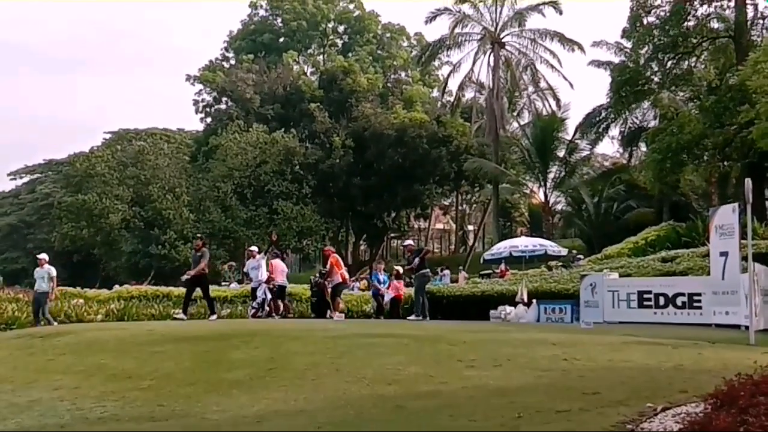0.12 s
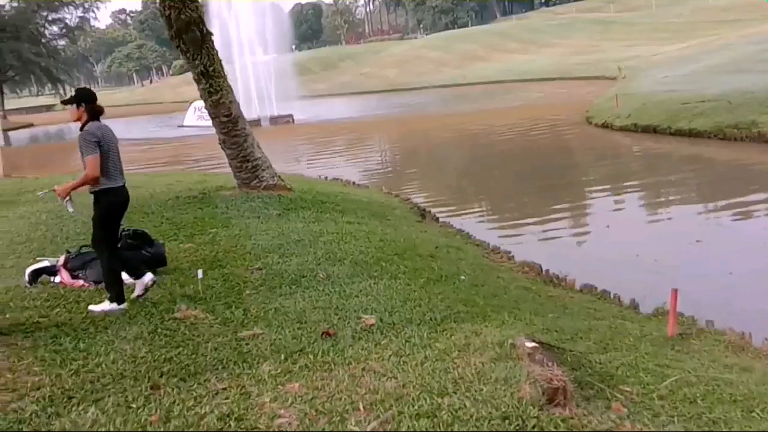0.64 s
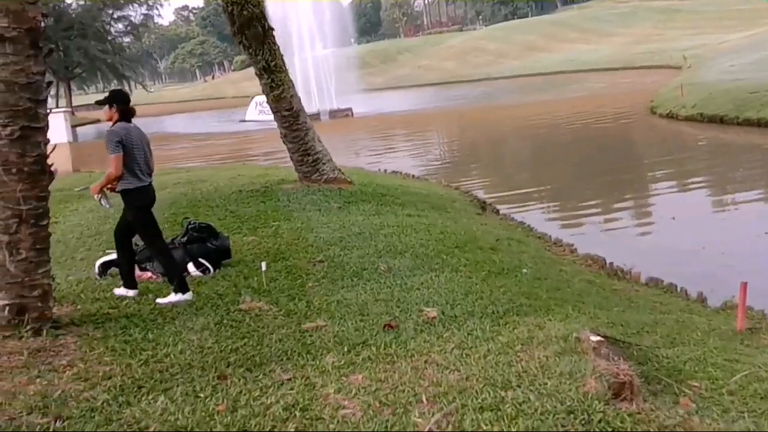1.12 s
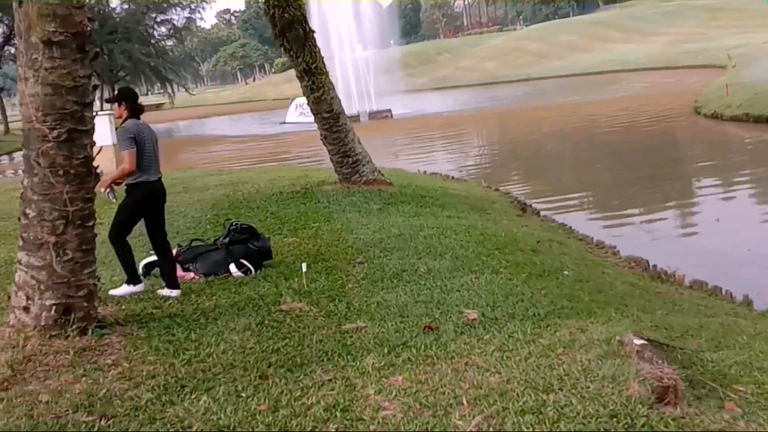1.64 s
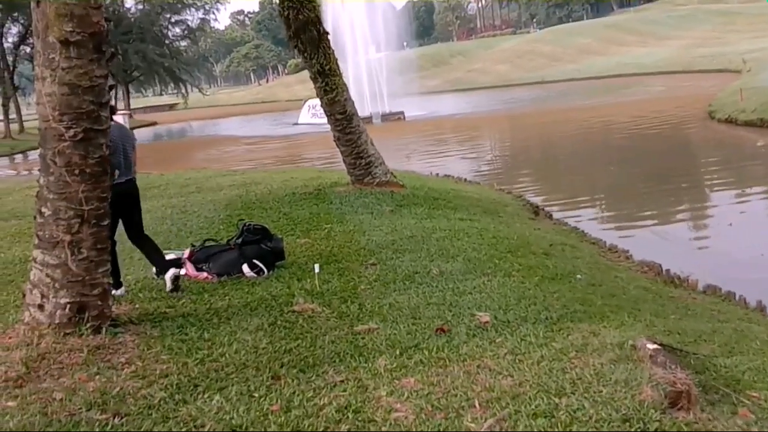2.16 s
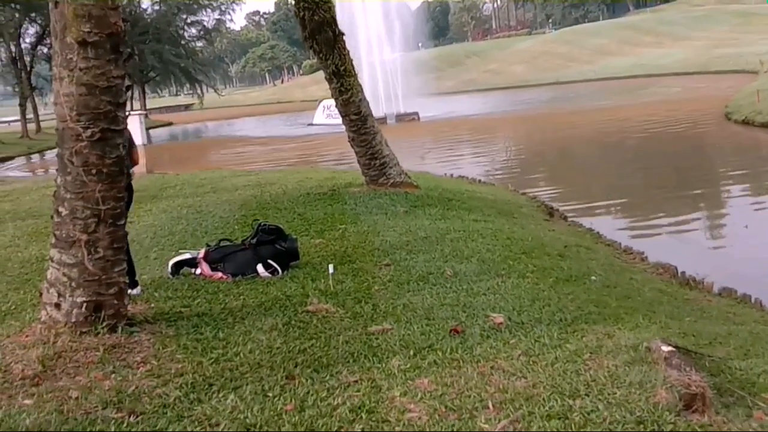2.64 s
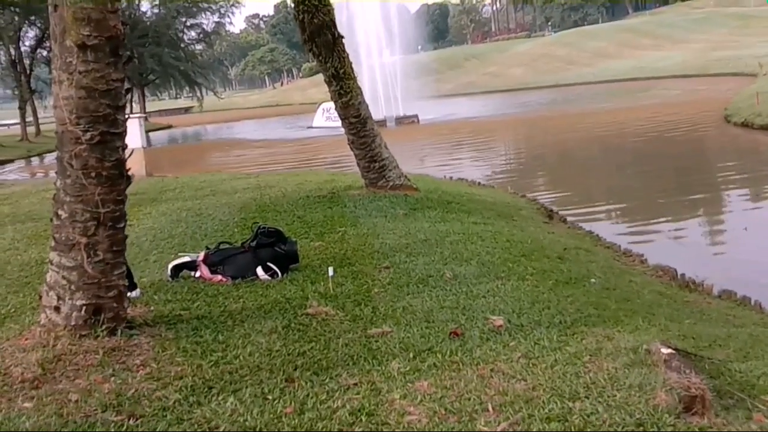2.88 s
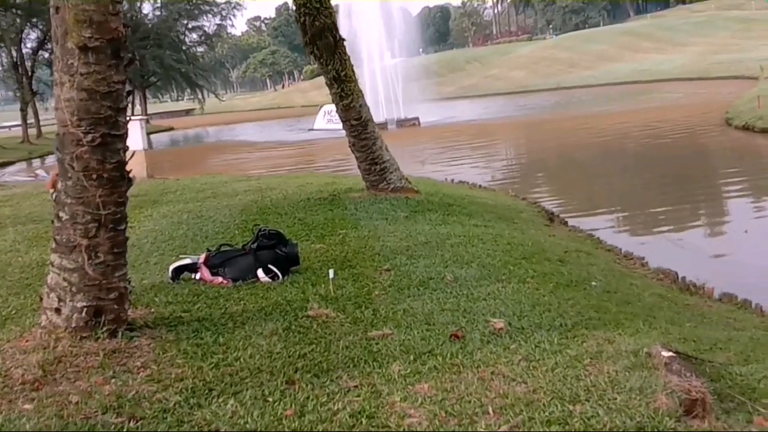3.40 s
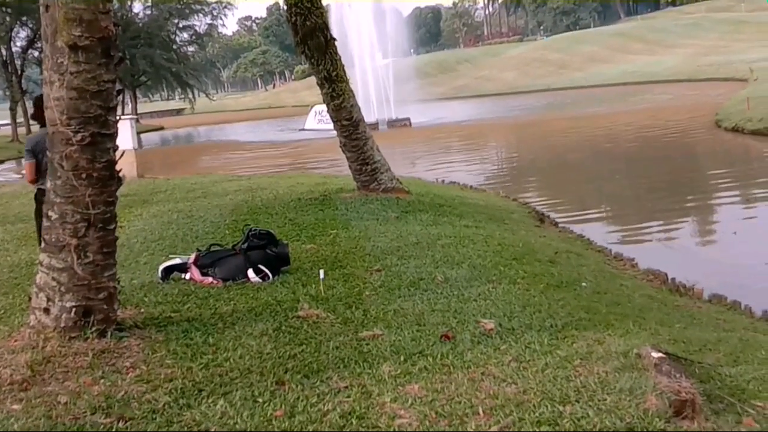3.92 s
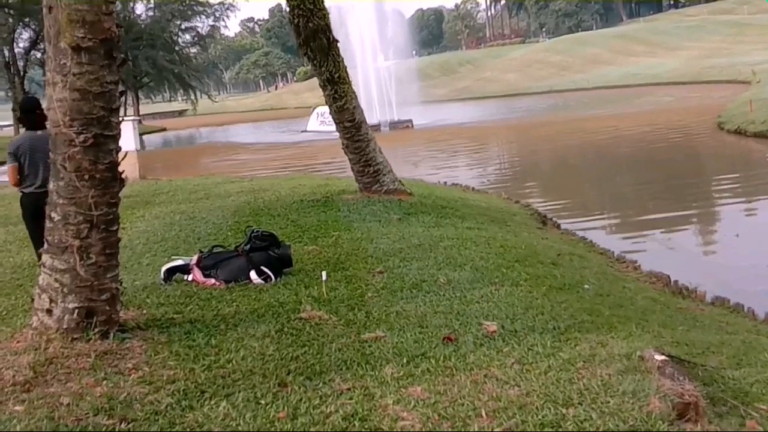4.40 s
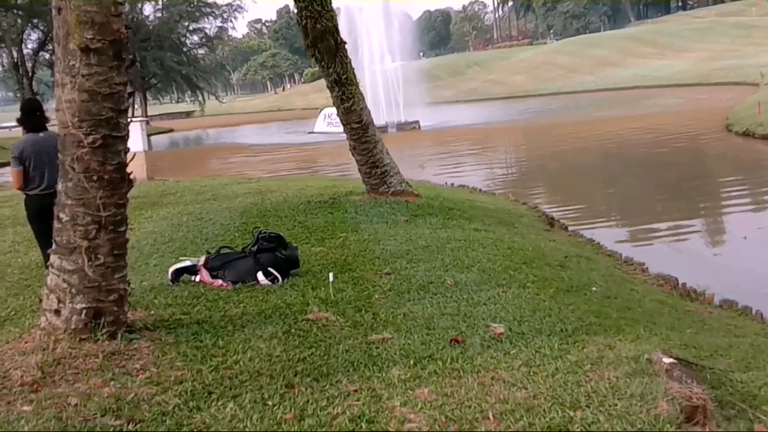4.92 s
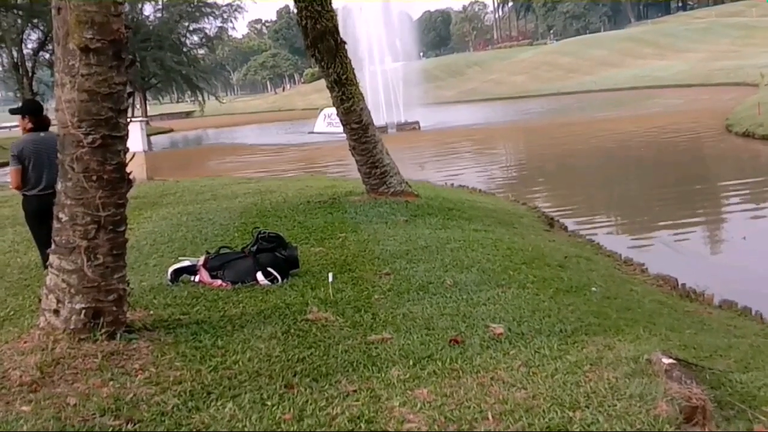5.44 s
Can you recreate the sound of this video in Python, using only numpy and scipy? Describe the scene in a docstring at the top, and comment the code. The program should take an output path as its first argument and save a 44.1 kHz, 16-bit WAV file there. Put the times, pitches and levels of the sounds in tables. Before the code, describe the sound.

A nearly silent lawn with light wind bumps cuts out, and after a brief gap water spray rises within a third of a second and stays. The fountain is smooth hiss, with small ringing drops and low bubbling surges where water lands. Irregular bassy wind hits the microphone in clusters. The sound is slightly hollow, coloured by the camera case, with thin compressed treble and shifting width.

```python
"""Lawn, then pond fountain

A small camera outdoors: a quiet lawn, a short silence, then a pond fountain fading in.
Shaped noise makes the spray and the air, all coloured by the camera's case; ringing bubbles make drops and gurgles.
Wind rumbles as uneven low noise and thumps as short swings on the microphone; one faint whistle is a gliding sine."""
import sys
import numpy as np
from scipy import signal
from scipy.fft import rfft, irfft
from scipy.io import wavfile
from scipy.ndimage import uniform_filter1d

SR = 44100
rng = np.random.default_rng(int(sys.argv[2]) if len(sys.argv) > 2 else 0)


def gain_from_decibels(decibels):
    """Convert decibel values to linear amplitude factors."""
    exponent = np.asarray(decibels, float) / 20
    return 10 ** exponent


def generate_wav(sig):
    """Save sig (samples, or channels by samples) to the path in sys.argv[1] as 16-bit PCM at SR."""
    pcm = np.round(np.clip(np.atleast_2d(sig).T, -1, 1) * 32767).astype(np.int16)
    wavfile.write(sys.argv[1], SR, pcm)


N = 244755


def evened(x):
    """Scales to rms 1."""
    return x / np.sqrt(np.mean(x ** 2) + 1e-20)


def read(points, hz):
    """Reads a spectrum table on a log-frequency axis."""
    f, value = np.transpose(points)
    return np.interp(np.log(hz + 1), np.log(f + 1), value)


def slow(hz, count):
    """Random wander of rms 1 at count evenly spread moments: sines up to hz, the slower ones stronger."""
    t = np.linspace(0, N / SR, count)
    waves = [np.sin(2 * np.pi * (f * t + rng.random())) / np.sqrt(f) for f in np.geomspace(hz / 20, hz, num=24)]
    return evened(sum(waves))


def airy(colour_db, width_db, size, patchy_db, flicker_db, sway_db):
    """Stereo noise from random short-time spectra with patches, shared flicker and a swaying width."""
    hop = size // 4
    frames = N // hop + 5
    hz = np.fft.rfftfreq(size, 1 / SR)
    a, b, c, d, patches = rng.standard_normal((frames, len(hz), 5)).T
    patches = uniform_filter1d(patches, size=5, axis=0)
    patches = evened(uniform_filter1d(patches, size=8, axis=1))
    field = gain_from_decibels(colour_db(hz)[:, None] + patchy_db * patches + flicker_db * slow(16, count=frames))
    mid = a + 1j * b
    side = (c + 1j * d) * gain_from_decibels(width_db(hz)[:, None] + sway_db * slow(30, count=frames))
    spectra = field * np.array([mid + side, mid - side])
    return evened(signal.istft(spectra, nperseg=size, noverlap=size - hop)[1][:, :N])


# peaks and notches of the case around the microphone: (f/Hz, width/Hz, level/dB)
CASE_RINGS = [(983, 78, -13.5), (1256, 160, 14), (2056, 360, 6.5), (2386, 54, -16), (2590, 330, 6),
              (2967, 91, -9), (6650, 111, -35)]


def case_db(hz):
    """The case boosts or weakens sound near its own pitches: a sum of bell shapes."""
    return sum(db / (1 + (2 * (hz - f) / width) ** 2) for f, width, db in CASE_RINGS)


# how wide the pond and the wind's rumble sound: (f/Hz, side over mid level/dB)
STEREO_WIDTH = [(60, -16.5), (150, -21), (380, -3), (900, -9), (1300, -18), (2400, -14.5), (4000, -4.5),
                (6000, -13.5), (10000, -6), (11800, -8), (12300, -28), (14800, -3)]


def stereo_width_db(hz):
    """How strong the left-right difference is beside the centre, pitch by pitch."""
    return read(STEREO_WIDTH, hz)


# quiet air over the lawn, before the case colours it: (f/Hz, relative level per Hz/dB)
LAWN_COLOUR = [(250, -12.5), (450, -17), (900, -20), (2000, -26), (5800, -29.5), (7000, -39.5),
               (13500, -46), (15000, -34)]


def lawn():
    """Faint, wide and fairly even air: shaped noise, coloured by the case at about half strength."""
    def colour_db(hz):
        return read(LAWN_COLOUR, hz) + 0.54 * case_db(hz) * (hz < 1800)  # the case is heard only below 1800 Hz

    air = airy(colour_db, lambda hz: 0 * hz - 3, size=1024, patchy_db=1.5, flicker_db=.5, sway_db=1)
    return gain_from_decibels(-69) * air


# wind strength between the thumps: (t/s, level/dB)
WIND_STRENGTH = [(0.0, -64.5), (0.5, -72.5), (0.62, -50.5), (0.91, -61), (1.07, -54.5), (1.68, -54),
                 (1.93, -56), (2.66, -56), (3.4, -60), (3.76, -53.5), (4.0, -62), (4.24, -59),
                 (4.36, -60.5), (4.58, -50.5), (5.09, -54), (5.27, -61.5), (5.55, -55)]


def wind_db(t):
    """Strength of the wind at the given moments."""
    return np.interp(t, *np.transpose(WIND_STRENGTH))


# turbulence at the microphone: (f/Hz, relative level per Hz/dB)
RUMBLE_COLOUR = [(12, -58), (20, -25), (32, -51), (65, -7), (92, 2.5), (158, 3.5), (216, -23.5), (330, -20),
                 (430, -52), (730, -120)]


def rumble():
    """Turbulent air presses unevenly on the microphone: lumpy low noise that follows the wind."""
    noise = airy(lambda hz: read(RUMBLE_COLOUR, hz), stereo_width_db, size=1024,
                 patchy_db=2.0, flicker_db=2.0, sway_db=2.0)
    return gain_from_decibels(wind_db(np.arange(N) / SR)) * noise


def eddies():
    """Lesser eddies at random moments, as strong as the wind allows: rows like those of the strong ones."""
    per_s, over_wind_db = 5.3, 3
    low_hz, high_hz, typical_s = 81.4, 137, 0.014
    when, pitch, size, span = rng.random((round(per_s * N / SR), 4)).T
    s = when * N / SR
    db = wind_db(s) + over_wind_db + 6 * (size - .5)
    return list(zip(s, db, low_hz + (high_hz - low_hz) * pitch, typical_s * (.5 + span)))


# strong eddies that hit the membrane: (t/s, peak level/dB, f/Hz, length at half height/s)
STRONG_EDDIES = [(0.014, -51, 96, 0.018), (0.287, -46.5, 140, 0.004), (0.305, -51, 81.4, 0.015),
                 (0.436, -40, 123, 0.0066), (0.473, -52.5, 74, 0.052), (1.531, -44, 103, 0.018),
                 (1.69, -45.5, 81, 0.025), (1.993, -43, 125, 0.013), (2.309, -40.5, 83.5, 0.0088),
                 (2.344, -36.5, 98, 0.019), (2.398, -42, 112, 0.0098), (2.616, -34.5, 127, 0.0091),
                 (2.642, -33, 95, 0.023), (2.675, -34, 101, 0.0059), (2.772, -39, 85, 0.018),
                 (3.085, -45.5, 110, 0.05), (3.706, -35, 105, 0.0065), (3.785, -36.5, 102.6, 0.032),
                 (3.84, -38, 85, 0.016), (4.417, -32.8, 96, 0.016), (4.586, -37, 97, 0.051),
                 (4.634, -35, 93, 0.014), (4.725, -38, 94, 0.028), (4.813, -40, 96, 0.011),
                 (4.842, -31.5, 98, 0.0096), (4.885, -38, 91, 0.039), (4.932, -35, 86, 0.014),
                 (5.097, -41.5, 105, 0.013), (5.229, -33.5, 120, 0.01), (5.251, -37.5, 94.5, 0.023),
                 (5.489, -33, 124, 0.015), (5.509, -28.5, 133, 0.0074), (5.532, -38, 119, 0.029)]


def thumps():
    """Each eddy swings the membrane briefly: a low cosine under a bell-shaped envelope."""
    t, out = np.arange(N) / SR, np.zeros(N)
    rows = STRONG_EDDIES + eddies()
    for (s, db, hz, length), turn in zip(rows, rng.random((len(rows), 1))):
        near = slice(max(round((s - 2 * length) * SR), 0), round((s + 2 * length) * SR))
        swing = np.cos(2 * np.pi * (hz * (t[near] - s) + turn))
        bell = .5 ** ((2 * (t[near] - s) / length) ** 2)
        out[near] += gain_from_decibels(db) * swing * bell
    return out


def wind():
    """On the microphone: an uneven low rumble that swells and sinks with the wind, and separate thumps."""
    return rumble() + thumps()


def whistle():
    """A short faint sine with soft ends, its pitch arching up and back."""
    start_s, length_s, base_hz, arch_hz, level_db = .83, .105, 1300, 105, -47
    u = np.clip((np.arange(N) / SR - start_s) / length_s, 0, 1)  # 0 to 1 along the note
    hz = base_hz + arch_hz * np.sin(np.pi * u ** 0.84) ** 0.34
    tone = np.sin(2 * np.pi * np.cumsum(hz) / SR)
    return np.sqrt(2) * gain_from_decibels(level_db) * np.sin(np.pi * u) ** 0.29 * tone


def drops(per_s, low_hz, high_hz, cycles, spread_db):
    """Drops that trap a bubble: short rings that rise in pitch, a few larger than the rest."""
    out = np.zeros(N)
    for hz in np.geomspace(low_hz, high_hz, num=24):
        u = np.arange(int(3 * cycles * SR / hz)) / SR * hz / cycles
        ring = np.sin(2 * np.pi * cycles * u * (1 + 0.014 * u)) * u * np.exp(-2.5 * u)
        hits = rng.random(N) < per_s / 24 / SR
        train = hits * gain_from_decibels(spread_db * np.minimum(rng.exponential(1, N), 4))
        out += signal.oaconvolve(train, ring / np.linalg.norm(ring))[:N]
    return evened(out)


# falling water before the case colours it: (f/Hz, relative level per Hz/dB)
SPRAY_COLOUR = [(150, -16.5), (450, -28.5), (530, -23), (800, -22), (1500, -10.5), (2900, -15),
                (3450, -24.5), (4250, -25), (4700, -13.5), (6000, -11.5), (8000, -14.5), (10000, -20.5),
                (11300, -29.5), (12200, -44), (13800, -35), (15000, -31)]


def spray_db(hz):
    """Colour of the falling water as heard through the case."""
    return read(SPRAY_COLOUR, hz) + case_db(hz)


def hiss():
    """Fine spray: so many tiny splashes that they blend into smooth noise."""
    return airy(spray_db, stereo_width_db, size=1024, patchy_db=2.0, flicker_db=.5, sway_db=-2.5)


def patter():
    """Separate drops that ring as bubbles, given the same colour as the spray."""
    spectrum = rfft(drops(2500, 890.5, 10680, 5.0, spread_db=4.0))
    spectrum /= np.sqrt(uniform_filter1d(abs(spectrum) ** 2, size=2000))  # even spectrum before the colour
    return evened(irfft(spectrum * gain_from_decibels(spray_db(np.fft.rfftfreq(N, 1 / SR))), N))


# surges of heavier water landing in the pond: (t/s, peak level/dB)
WATER_SURGES = [(0.84, -61.5), (0.95, -62.5), (1.11, -66), (1.42, -64.5), (1.91, -60.5), (2.1, -57),
                (2.21, -54), (2.43, -58), (2.93, -58.5), (3.2, -60.5), (3.39, -59), (3.54, -55.5),
                (4.02, -59), (4.25, -60.5), (4.57, -57), (4.78, -59), (4.96, -64.5), (5.34, -56.5)]


def surging():
    """Gain of the gurgles: an even bed, and each surge swelling to its peak and ebbing away."""
    bed_db, swell_db_per_s, ebb_db_per_s = -66.5, 190, 178
    surges = np.array(WATER_SURGES)
    late = np.arange(N) / SR - surges[:, :1]  # seconds after each peak
    shape_db = np.minimum(swell_db_per_s * late, -ebb_db_per_s * late)
    peaks = gain_from_decibels(surges[:, 1:] + shape_db)
    return np.sqrt(gain_from_decibels(bed_db) ** 2 + (peaks ** 2).sum(0))


def gurgles():
    """Larger, lower bubbles where the jet lands, louder with each surge."""
    bubbles = drops(220, 580, 920, 11, spread_db=2.6)
    # a little wider than a point: a shifted copy, opposite left and right
    bubbles = bubbles + gain_from_decibels(-13.0) * np.outer([1, -1], np.roll(bubbles, SR))
    return surging() * bubbles


# loudness of the spray as it drifts with the breeze: (t/s, level/dB)
SPRAY_DRIFT = [(0.9, -41.5), (1.65, -44.5), (2.38, -41.5), (2.71, -44.5), (3.7, -43), (4.0, -44.5),
               (4.46, -44), (5.15, -44.5), (5.55, -43.5)]


def fountain():
    """Water falling on a pond: smooth hiss, patter of drops and low gurgles."""
    drift = gain_from_decibels(np.interp(np.arange(N) / SR, *np.transpose(SPRAY_DRIFT)))
    return drift * (hiss() + gain_from_decibels(-11.0) * patter()) + gurgles()


def scene():
    """The lawn until it cuts to silence, then the pond fading in; wind in both, and one whistle."""
    lawn_end_s, pond_start_s, fade_in_s = .52, 0.592, 0.36
    t = np.arange(N) / SR
    first = np.clip((lawn_end_s - t) / 0.0076, 0, 1)
    second = np.clip((t - pond_start_s) / fade_in_s, 0, 1) ** 0.95  # a nearly straight rise
    return first * lawn() + second * fountain() + whistle() + (first + second) * wind()


# how far a narrow strip may sink under its neighbours before it drops out: (f/Hz, level/dB)
STRIP_MARGIN = [(800, 60), (1000, 13), (3000, 9), (4300, 7.5), (5500, 6.5), (8000, 5), (9500, 3.2),
                (11000, 2.8), (12100, 5), (13000, 2.5), (14500, 4)]


def thinned(x):
    """Narrow strips far under their neighbours drop out; at times the left-right part drops out as a whole,
    save the bass and the hollow near 4 kHz."""
    parts = [(x[0] + x[1]) / 2, (x[0] - x[1]) / 2]
    hz, t, (mid, side) = signal.stft(parts, SR, nperseg=2048, noverlap=1536)

    def strip(z, size):
        """Power averaged over nearby pitches and moments."""
        return uniform_filter1d(uniform_filter1d(abs(z) ** 2, size=size, axis=0), size=4, axis=1)

    # the sound folds to the centre while a random wander is above a mark, more often from 12 kHz up
    folded = slow(45, count=len(t)) > np.where(hz < 12000, .2, -.7)[:, None]
    band = (hz > 950) & ((hz < 3700) | (hz > 4350))
    side_kept = strip(side, size=8) > gain_from_decibels(-4) * strip(side, size=80)  # at most 2 dB under in power
    side = side * (1 - band[:, None] * folded) * side_kept
    limit = gain_from_decibels(-2 * read(STRIP_MARGIN, hz))[:, None]  # doubled because it compares powers
    mid = mid * (strip(mid, size=5) > limit * strip(mid, size=60))
    return signal.istft([mid + side, mid - side], SR, nperseg=2048, noverlap=1536)[1][:, :N]


def low_pass(x):
    """Removes everything above the highest recorded frequency."""
    return signal.sosfilt(signal.butter(12, 15430, fs=SR, output="sos"), x)


def record(dry):
    """Low-cut of the microphone at 36 Hz, then thin dropouts and a narrowing of the stereo image."""
    low_cut = signal.butter(2, 36, "high", fs=SR, output="sos")
    mix = thinned(signal.sosfilt(low_cut, dry))
    return low_pass(mix)


dry = scene()
out = record(dry)
generate_wav(out)
```